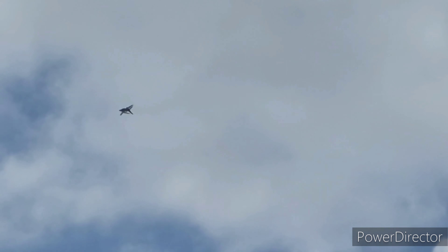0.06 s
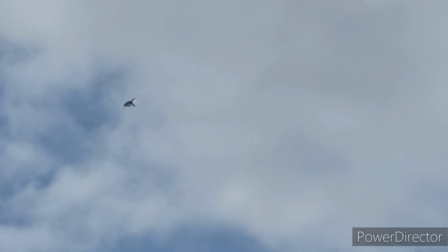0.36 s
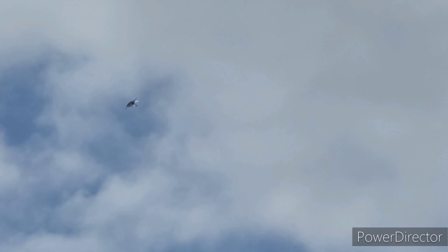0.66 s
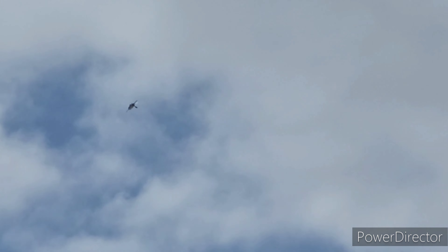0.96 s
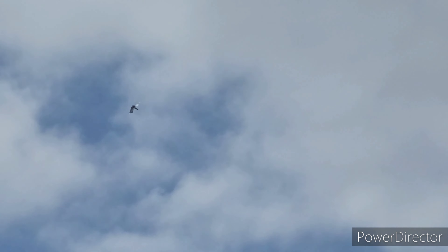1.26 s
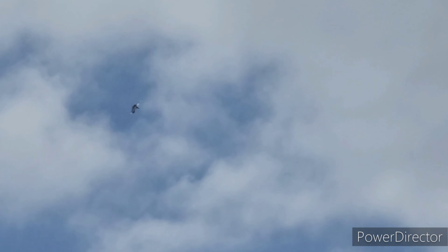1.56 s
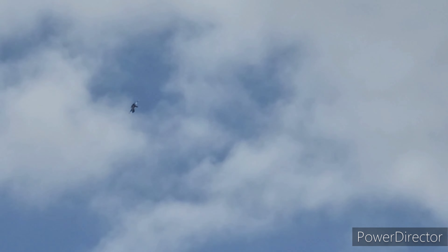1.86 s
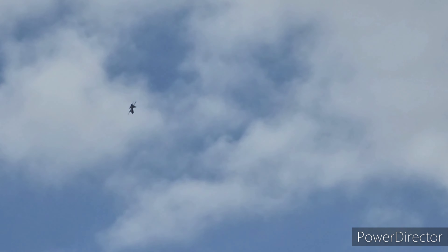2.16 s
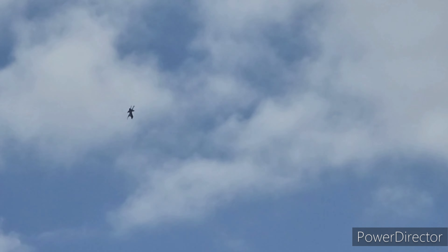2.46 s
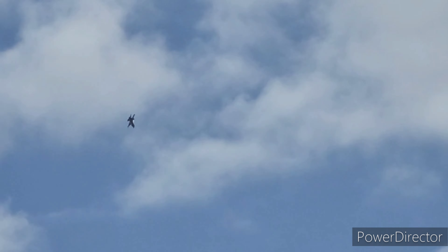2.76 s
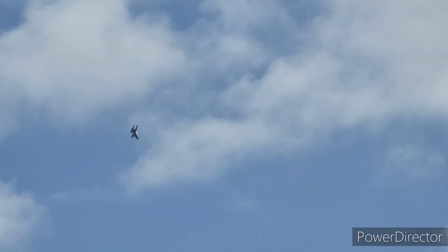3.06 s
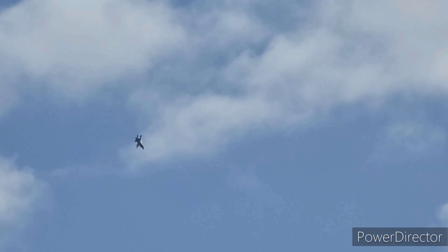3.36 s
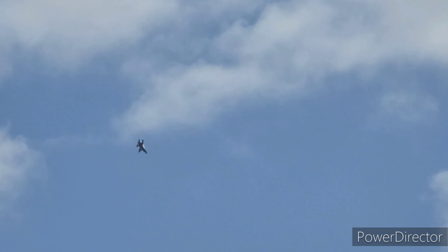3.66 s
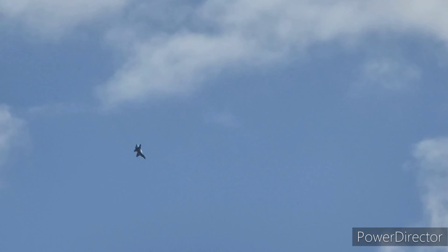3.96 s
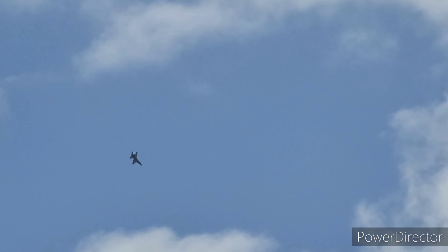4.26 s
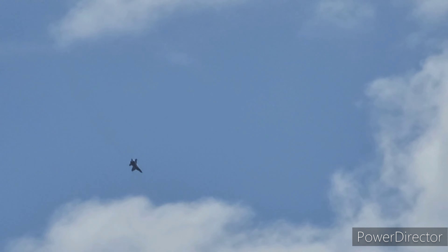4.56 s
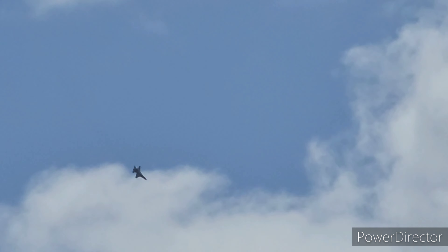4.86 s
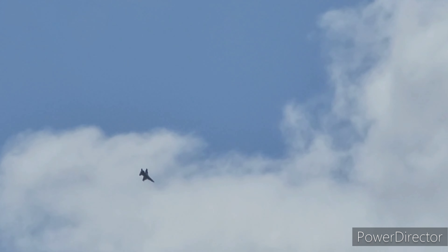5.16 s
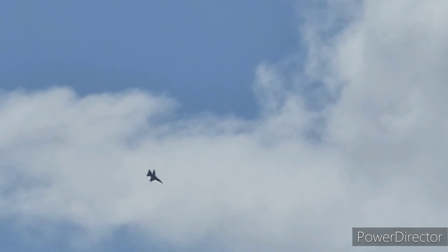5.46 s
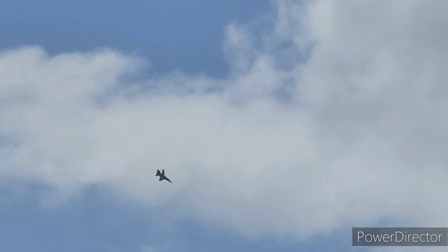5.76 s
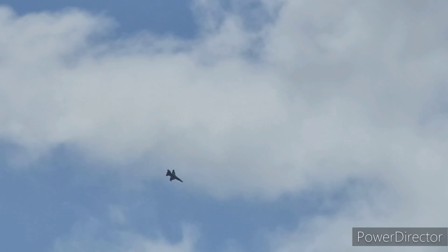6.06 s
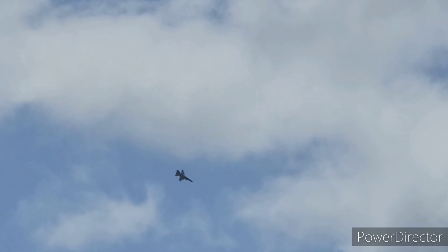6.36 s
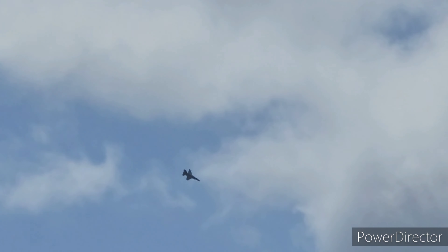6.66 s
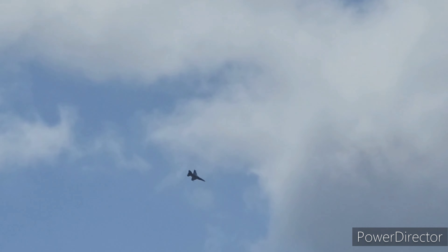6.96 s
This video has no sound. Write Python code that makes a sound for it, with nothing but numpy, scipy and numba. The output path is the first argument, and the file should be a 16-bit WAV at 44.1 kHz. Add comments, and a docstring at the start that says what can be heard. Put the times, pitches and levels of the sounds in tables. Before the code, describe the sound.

A fighter jet turns high over an open airfield, its deep rumble and airy roar continuous for seven seconds. The rumble surges at about 0.2, 1, 1.4 and 2.3 seconds, with brief gliding whooshes between 0.5 and 1 second. A narrow bass boom throbs unevenly, about three times a second, under a low wavering engine moan. The sound eases slightly around 3 to 3.5 seconds, then builds, growing darker and more hollow as the jet descends. Short tearing flares of roar come near 4.6, 5.4, 5.8 and 6.1 seconds. The loudest stretch runs from about 4.5 seconds onward, with low throbs and hollow ringing resonances, and the rumble is still strong at the end. Wind buffets the hand-held stereo microphone lightly at the start and more between 3.6 and 5.5 seconds. A faint steady hiss with a barely audible thin whine lies underneath.

```python
"""You hear a fighter jet rumble and roar as it turns high over an airfield.
It points its exhaust at a hand-held camera. Swirls in the exhaust, called eddies, make the noise,
which comes through turbulent air and by several paths. Single bands of it swell briefly, as gliding
whooshes, low throbs and hollow notes. A narrow boom rings in the bass, and wind buffets the two
microphone openings (the ports). A limiter turns down even the steady hiss under the loudest swells."""
import sys
import numpy as np
from scipy import signal
from scipy.fft import rfft, irfft
from scipy.io import wavfile
from scipy.ndimage import uniform_filter1d, minimum_filter1d
from numba import njit

SR = 44100
rng = np.random.default_rng(int(sys.argv[2]) if len(sys.argv) > 2 else 0)


def generate_wav(sig):
    """Save sig (samples, or channels by samples) to the path in sys.argv[1] as 16-bit PCM at SR."""
    pcm = np.round(np.clip(np.atleast_2d(sig).T, -1, 1) * 32767).astype(np.int16)
    wavfile.write(sys.argv[1], SR, pcm)


N = 308700  # 7 seconds

# The tone of the jet's deep thunder, low rumble and higher roar. Each row: frequency in Hz, level in dB.
THUNDER_SPECTRUM = [(15, -39), (30, -14), (45, -2.5), (57, 3), (64, 2.5), (75, 8), (86, 6), (112, -14),
                    (150, -54.5)]
RUMBLE_SPECTRUM = [(90, -32.5), (118, 0), (138, 3.5), (165, -2), (200, 0.5), (240, -2), (272, -2),
                   (312, -6.5), (370, -8), (450, -8.5), (540, -14.5), (800, -57.5)]
ROAR_SPECTRUM = [(250, -23.5), (450, -14.5), (570, 2.5), (760, 1.5), (1000, -1.5), (1270, -4.5),
                 (1570, -8.5), (1780, -22), (2030, -23), (2450, -40), (3200, -50), (6000, -76.5)]
# How alike the jet is at the two ports. Each row: frequency in Hz, likeness from 0 to 1.
JET_LIKENESS = [(100, 0.99), (320, 0.93), (550, 0.79), (1000, 0.79), (1500, 0.41), (2200, 0.94),
                (3000, 0.27)]
# The deep bass that drives both thunder and boom. Each row: time in seconds, level in dB.
BASS_LEVEL = [(0, -28.5), (.2, -19.5), (.35, -37), (.65, -38), (.9, -26.5), (1.05, -20.5), (1.75, -17.5),
              (2.4, -18), (2.85, -22), (3.35, -18), (3.6, -19), (3.8, -18.5), (4.7, -12), (5.3, -19.5),
              (5.7, -15), (5.83, -9), (6.05, -18.5), (7, -9.5)]
# The large eddies' rumble between surges. Each row: time in seconds, level in dB.
RUMBLE_LEVEL = [(0, -13), (.42, -17), (.52, -18.5), (.88, -16), (1.2, -15), (1.65, -15.5), (1.9, -12.5),
                (2.55, -13), (3.1, -18), (3.68, -14), (3.85, -12.5), (4.5, -9.5), (5, -11), (5.35, -8.5),
                (5.6, -8), (5.9, -11.5), (6.55, -14), (7, -6.5)]
# The fine eddies' roar between flares, louder when the nozzle points at the camera.
# Each row: time in seconds, level in dB.
ROAR_LEVEL = [(0, -20.5), (.42, -20), (.72, -22), (1.05, -17.5), (1.2, -22.5), (1.55, -21.5), (2.2, -23.5),
              (2.6, -22), (3.0, -26), (3.7, -20.5), (4.35, -14.5), (4.88, -18.5), (5.03, -24.5),
              (5.2, -17.5), (5.36, -18), (5.6, -17), (6.0, -18.5), (6.48, -20), (6.85, -16), (7, -19)]
# Echoes close to the camera. Each row: time in seconds, weight of the short echo, weight of the long one.
NEAR_ECHOES = [(0, 0.025, 0.032), (3.2, 0.028, 0.073), (4.6, 0.08, 0.21), (5.6, 0.38, 0.13),
               (6.1, 0.19, 0.32), (7, 0.28, 0.32)]
# The moan, gliding as the jet turns. Each row: time in seconds, pitch in Hz, dB relative to the rumble.
MOAN_GLIDE = [(0, 190, -3.5), (.8, 213.8, -19), (1.35, 135, -5), (2.2, 175, -6), (3.65, 130, -5),
              (3.8, 205, -11), (4.2, 208, -10.5), (4.45, 203, -9), (4.7, 145, -2), (5.25, 137, -1.5),
              (5.65, 130, 1), (5.85, 125.6, -11), (6.05, 135.6, 2), (6.45, 140, -17), (6.8, 165.3, -4),
              (7, 147, 0)]
# Ringing notes that make the rumble hollow. Each row: pitch in Hz, width in Hz, relative level in dB.
HOLLOW_NOTES = [(281.4, 12.3, -0.5), (351.6, 15, -2.5), (392.6, 9.8, -3), (445.3, 14, -3.5),
                (497.6, 8.8, -10)]
# Those notes stand out as the jet sinks. Each row: time in seconds, dB relative to the rumble.
HOLLOW_NOTE_LEVEL = [(0, -17), (3.5, -20), (4.2, -12.5), (4.6, -10.5), (5.15, -6), (5.65, -6), (5.9, -13.5),
                     (6.4, -9.5), (7, -11.5)]
# Surges of the rumble. Each row: peak time and half length in seconds, rise in dB, tilt in dB.
# A tilt above 0 is brighter, below 0 darker.
RUMBLE_SURGES = [(0.243, 0.056, 6, -3.5), (1.016, 0.07, 8.5, -6), (1.406, 0.094, 9, -3),
                 (2.32, 0.11, 8, -4.5), (4.013, 0.012, -1, 5), (4.6, 0.13, 0.5, -4.5), (5.627, 0.16, 2, 4),
                 (6.182, 0.093, 4.5, 1), (6.347, 0.064, 3, 6)]
# Tearing flares of the roar. Each row: peak time, rise time and fall time in seconds, rise and tilt in dB.
ROAR_FLARES = [(.55, 0.014, 0.036, 4, 9), (.672, 0.0082, 0.017, -2, 18), (.935, 0.017, 0.04, 6.5, 4),
               (1.042, 0.011, 0.013, -1.5, 4), (1.48, 0.084, 0.15, 3, 1), (1.89, 0.048, 0.12, 3.5, -2),
               (3.53, 0.039, 0.048, 5, -10), (3.83, 0.033, 0.055, 3, -1), (3.968, .004, .02, -1.5, 0),
               (4.186, .008, 0.03, 4, -3), (4.32, 0.022, 0.022, -1, 5), (4.61, 0.038, 0.08, 5.5, -1),
               (4.82, 0.029, 0.084, 4, 0), (5.21, 0.037, 0.045, 0.5, -3), (5.388, 0.0027, 0.055, 7.5, 0.5),
               (5.6, .04, 0.1, 3.5, 0), (5.83, .04, 0.092, 3.5, 2.5), (6.08, 0.036, 0.064, 6, 3),
               (6.36, 0.069, 0.084, 4.5, -4.5), (6.64, 0.011, 0.019, 4.5, 0)]
# Throbs and lulls of the boom. Each row: peak time in seconds, change in dB.
BOOM_THROBS = [(.09, 0), (.23, -2), (.5, 15), (.75, 10), (1.06, 5.5), (1.39, 5), (1.74, 9.5), (2.06, 4.5),
               (2.42, 8.5), (2.73, 8), (2.85, 3), (3.01, 7), (3.26, 3.5), (3.36, -25), (3.47, -1),
               (3.78, 8), (4.02, -7), (4.18, 1.5), (4.66, 2.5), (5.85, -9), (6.27, 3.5), (6.46, 4.5),
               (6.8, -3)]
# The tone of the camera's hiss. Each row: frequency in Hz, level in dB.
HISS_SPECTRUM = [(800, -10.5), (2000, 10), (2600, 1.5), (3100, 0.5), (3450, 0), (3850, -0.5), (4450, -7.5),
                 (5000, -6.5), (5450, -6.5), (5720, -4.5), (6020, -12), (6500, -8), (6850, -13.5),
                 (7300, -12), (8300, -13), (8750, -15.5), (9250, -16.5), (9800, -20), (11600, -22.5),
                 (13400, -27), (15500, -31.5)]
# How loud the hiss is. Each row: time in seconds, level in dB.
HISS_LEVEL = [(0, -37.5), (1.4, -38), (1.6, -37), (2.2, -38), (2.75, -37.5), (3.3, -38.5), (4.9, -38),
              (5.3, -39), (7, -38.5)]
# How alike the hiss is at the two ports. Each row: frequency in Hz, likeness from 0 to 1.
HISS_PORT_LIKENESS = [(2100, 0.23), (2800, 0.091), (5000, 0), (9000, 0.056)]
# The camera's faint whine. Each row: pitch in Hz, level in dB.
WHINE_TONES = [(2280, -60), (3363, -63), (8317, -80), (10912, -84.5), (13131, -92)]
# The tone of the wind on the ports. Each row: frequency in Hz, level in dB.
WIND_SPECTRUM = [(12, -14.5), (30, -15.5), (65, 4.5), (110, -7.5), (160, -4.5), (240, -20), (500, -23.5),
                 (1500, -74)]
# Gusts on the ports. Each row: peak time and half length in seconds, level in dB.
WIND_GUSTS = [(0.22, 0.37, -20.5), (1.25, 0.29, -33), (1.8, 0.13, -27), (2.46, 0.039, -18),
              (2.7, 0.064, -20.5), (3.206, 0.25, -27), (3.691, 0.079, -10.5), (4.053, 0.19, -14),
              (4.68, 0.11, -10), (5.265, 0.18, -13.5), (5.662, 0.29, -20.5)]
# Brief swells of one band of the jet noise. Each row: peak time and half length in seconds, pitch in Hz,
# glide in octaves per second (0 holds the pitch), width in Hz, level in dB.
BAND_SWELLS = [(0.46, 0.072, 687, 7, 180, -23.5), (0.555, 0.03, 1266, 2, 170, -20),
               (0.677, 0.0096, 1137, -1.5, 200, -19), (0.949, 0.068, 454, -2, 43, -16),
               (1.376, 0.059, 139.2, -1.5, 32, -9), (1.41, 0.12, 285.6, -2, 79, -10.5),
               (2.284, 0.043, 148, -1.5, 30, -6.5), (2.349, 0.2, 288.6, 0.5, 130, -12),
               (2.378, 0.044, 184.9, -2.5, 53, -7), (3.852, 0.036, 386.5, 1.5, 47, -12),
               (3.863, 0.044, 134.6, 0, 15, -18), (3.993, 0.036, 205.6, 0, 15, -8),
               (4.032, 0.028, 343, 0, 21, -11.5), (4.168, 0.037, 439, 0.5, 40, -15),
               (4.447, 0.031, 1402, 0.5, 110, -25), (4.595, 0.029, 148, 1, 23, -8.5),
               (4.616, 0.023, 1250, -5.5, 130, -20.5), (4.87, 0.046, 490.5, -1, 50, -16),
               (5.053, 0.045, 138, 0.5, 18, -8), (5.227, .07, 137.8, 0, 13, -7.5),
               (5.447, 0.026, 135, -0.5, 18, -11), (5.61, 0.048, 358, 0.5, 35, -5.5),
               (5.631, 0.062, 479, -1, 59, -10), (5.713, 0.032, 1220, -0.5, 190, -18),
               (5.86, 0.022, 1094, 0, 110, -22), (5.907, 0.018, 350, -0.5, 75, -10.5),
               (5.991, 0.034, 396, 1, 21, -10), (6.1, .06, 443, 1, 22, -17.5),
               (6.21, 0.057, 137.4, -1, 14, -9.5), (6.33, 0.022, 390, -0.5, 67, -10.5),
               (6.39, 0.018, 1068, -5, 81, -24), (6.635, 0.03, 371.6, 2.5, 33, -11),
               (6.65, 0.017, 1035, 0.5, 110, -17)]


def undb(db):
    """Turn decibels into a number to multiply a sound by."""
    return 10 ** (np.asarray(db) / 20)


def unit(x):
    """Scale a signal to an average power of 1."""
    return x / np.sqrt(np.mean(x ** 2))


def curves(table):
    """Join a table's points with straight lines in time: one curve for each column."""
    s, *columns = np.transpose(table)
    return [np.interp(np.arange(N) / SR, s, column) for column in columns]


def on_bins(points):
    """Read a table at every frequency of the spectrum, on a log scale."""
    hz, value = np.transpose(points)
    return np.interp(np.log(np.arange(N // 2 + 1) * SR / N + 1), np.log(hz), value)


def walk(rate):
    """A smooth random wobble of size about 1, with about rate changes a second."""
    hz = np.arange(N // 2 + 1) * SR / N
    return unit(irfft(rfft(rng.standard_normal(N)) * np.exp(-(hz / rate) ** 2), N))


def swell(s, half_s):
    """A smooth rise and fall that peaks at 1 at time s."""
    return np.exp(-((np.arange(N) / SR - s) / half_s) ** 2)


def noise(spectrum):
    """Two unrelated noises with the given spectrum, dying away steeply above its last point."""
    top_hz, top_db = spectrum[-1]
    shape = undb(on_bins(list(spectrum) + [(2 * top_hz, top_db - 60)]))
    return unit(irfft(rfft(rng.standard_normal((2, N))) * shape, N))


def steady(x, seconds):
    """Take the slow swells out of a noise and keep its fast flutter."""
    size = max(int(seconds * SR), 1)
    power = uniform_filter1d(uniform_filter1d(np.mean(x ** 2, axis=0), size), size)
    return x / np.sqrt(power + 1e-12)


def narrow_band(hz, width_hz):
    """Noise gathered round one pitch, which may glide."""
    phase = 2 * np.pi * np.cumsum(hz * np.ones(N)) / SR
    band = walk(width_hz) * np.cos(phase) + walk(width_hz) * np.sin(phase)
    return steady(band[None], seconds=0.063)


def at_ports(pair, likeness):
    """Mix two noises into left and right, as alike as the table says."""
    alike = np.clip(on_bins(likeness), 0, 1)
    shared, opposite = irfft(rfft(pair) * np.sqrt([1 + alike, 1 - alike]), N)
    return shared + opposite * np.array([[1], [-1]])


def delayed(x, lag_ms):
    """The sound a little later; the delay may change over time."""
    n = np.arange(N)
    return np.array([np.interp(n - lag_ms * SR / 1000, n, channel, period=N) for channel in x])


def tilted(x, tilt_db, pivot_hz):
    """Tip the tone like a seesaw: the highs go up as the lows go down."""
    hz = np.arange(N // 2 + 1) * SR / N
    low = irfft(rfft(x) / (1 + (hz / pivot_hz) ** 6), N)
    return low * undb(-tilt_db / 2) + (x - low) * undb(tilt_db / 2)


def jet():
    """Three sizes of eddy follow the swing of the nozzle; surges and flares change their level and tone."""
    t = np.arange(N) / SR
    aim_db = curves(ROAR_LEVEL)[0]
    surge_db, surge_tilt_db = surges()
    flare_db, flare_tilt_db = flares()
    thunder_db = bass_db() + 2.0 * walk(9.8)
    rumble_db = curves(RUMBLE_LEVEL)[0] + surge_db + 1.3 * walk(8.1)
    roar_db = aim_db + flare_db + 0.32 * surge_db + 0.72 * walk(4.0)
    # The sound darkens as the jet draws away. The rumble brightens when the nozzle points at us.
    rumble_tilt_db = 5.5 - 1.29 * t + surge_tilt_db + (aim_db - aim_db.mean()) + 2.0 * walk(8)
    roar_tilt_db = 2 - 0.5 * t + flare_tilt_db + 0.19 * surge_tilt_db + 0.25 * walk(5.0)
    thunder = eddies(THUNDER_SPECTRUM, flutter_db=-0.5, flutter_hz=6.1, echo_share=0.13)
    rumble = eddies(RUMBLE_SPECTRUM, flutter_db=-0.5, flutter_hz=22, echo_share=0.3)
    roar = eddies(ROAR_SPECTRUM, flutter_db=1.24, flutter_hz=30, echo_share=0.21)
    # Pockets of air bend the short waves along slightly different paths, so the roar swirls.
    roar = longer_paths(roar, share=0.2, lag_ms=1.599, wander=0.4426, fade_hz=10.4)
    rumble = near_echoes(tilted(rumble, rumble_tilt_db, pivot_hz=258), strength=0.7)
    roar = near_echoes(tilted(roar, roar_tilt_db, pivot_hz=1030), strength=0.67)
    rumble = steady(rumble, seconds=0.033) + moan()
    thunder = steady(thunder, seconds=0.052) * undb(thunder_db)
    rumble = steady(rumble, seconds=0.051) * undb(rumble_db)
    roar = steady(roar, seconds=0.045) * undb(roar_db)
    return thunder + rumble + roar


def eddies(spectrum, flutter_db, flutter_hz, echo_share):
    """Exhaust mixes noisily with the air. The ground echoes it and turbulent air makes it flutter."""
    exhaust = at_ports(noise(spectrum), JET_LIKENESS)
    echoed = longer_paths(exhaust, echo_share, lag_ms=6.5, wander=0.1612, fade_hz=3.36)
    return echoed * undb(flutter_db * walk(flutter_hz))


def longer_paths(x, share, lag_ms, wander, fade_hz, count=3):
    """Late copies fade and drift, so ripples slide through the tone."""
    lags = [lag_ms * (k + 1) * np.exp(wander * walk(0.704)) for k in range(count)]
    return x + sum(share * walk(fade_hz) * delayed(x, lag) for lag in lags)


def near_echoes(x, strength, short_ms=2.34, long_ms=3.43):
    """Two quick echoes, the later one upside down, hollow the sound more as the jet sinks."""
    short, long = curves(NEAR_ECHOES)
    return x + strength * (short * delayed(x, short_ms) - long * delayed(x, long_ms))


def bass_db():
    """The level of the deep bass, which lifts a little with the surges."""
    return curves(BASS_LEVEL)[0] + 0.18 * surges()[0]


def moan():
    """The strongest eddies peel off at a nearly even, gliding rate; hollow notes drift above them."""
    moan_hz, moan_db = curves(MOAN_GLIDE)
    drift = 1 + 0.012 * walk(1.5)
    hollow = sum(undb(db) * narrow_band(hz * drift, width_hz) * undb(2.17 * walk(8.2))
                 for hz, width_hz, db in HOLLOW_NOTES)
    note = narrow_band(moan_hz, width_hz=15) * undb(moan_db)
    return note + hollow * undb(curves(HOLLOW_NOTE_LEVEL)[0])


def boom(pitch_hz=103.95, above_bass_db=4.5, cap_db=-11.5):
    """The exhaust noise keeps a narrow, wavering bass note ringing, with throbs and lulls."""
    ring = narrow_band(pitch_hz * (1 + 0.01533 * walk(2.95)), width_hz=10.7)
    base_db = np.minimum(bass_db() + above_bass_db, cap_db)
    throb_db = sum(db * swell(s, half_s=0.038) for s, db in BOOM_THROBS)
    return ring * undb(base_db + throb_db + 1.3 * walk(14.0))


def camera_noise():
    """The camera's gently wavering hiss, wide between left and right, with a few thin whining tones."""
    t = np.arange(N) / SR
    whine = sum(undb(db) * unit(np.sin(2 * np.pi * hz * t)) for hz, db in WHINE_TONES)
    hiss = unit(at_ports(noise(HISS_SPECTRUM), HISS_PORT_LIKENESS))
    return hiss * undb(curves(HISS_LEVEL)[0] + 0.96 * walk(15)) + whine


def wind(breeze_db=-31):
    """Gusts rise out of a light breeze and buffet each port on its own."""
    buffet = noise(WIND_SPECTRUM) * undb([walk(4.3), walk(42)])
    force = undb(breeze_db) + sum(undb(db) * swell(s, half_s) for s, half_s, db in WIND_GUSTS)
    return steady(buffet, seconds=0.16) * force


def surges():
    """The rumble billows up and sinks back. Gives its rise and its tilt in dB."""
    shapes = [swell(s, half_s) for s, half_s, _, _ in RUMBLE_SURGES]
    return np.array(RUMBLE_SURGES)[:, 2:].T @ np.array(shapes)


def band_swells():
    """Brief swells of one band of the jet noise: gliding whooshes, low throbs and hollow notes."""
    t, out = np.arange(N) / SR, 0
    for s, half_s, hz, octaves_per_s, width_hz, db in BAND_SWELLS:
        centre_hz = hz * 2 ** np.clip(octaves_per_s * (t - s), -2, 2)
        out = out + narrow_band(centre_hz, width_hz) * swell(s, half_s) * undb(db)
    return out


def flares():
    """Each flare of the roar comes and goes at its own pace. Gives the rise and the tilt in dB."""
    t = np.arange(N) / SR
    shapes = [swell(s, np.where(t < s, rise_s, fall_s)) for s, rise_s, fall_s, _, _ in ROAR_FLARES]
    return np.array(ROAR_FLARES)[:, 3:].T @ np.array(shapes)


def scene():
    """Add up everything that reaches the left and right channels."""
    return jet() + band_swells() + boom() + wind() + camera_noise()


@njit
def follow_peaks(size, release):
    """Jump to every peak and sink back slowly."""
    out, held = np.empty(len(size)), 0.
    for i in range(len(size)):
        held = max(size[i], held * release)
        out[i] = held
    return out


def limiter(x, ceiling, release_s, glide_samples=50):
    """Turn the volume down just before a peak that is too loud, and back up after it."""
    peaks = follow_peaks(np.abs(x).max(axis=0), np.exp(-1 / (release_s * SR)))
    gain = minimum_filter1d(np.minimum(1, ceiling / (peaks + 1e-9)), 2 * glide_samples)
    return x * uniform_filter1d(uniform_filter1d(gain, glide_samples), glide_samples)


def record(dry):
    """The camera holds down the peaks and cuts the treble above 15400 Hz."""
    limited = limiter(dry, ceiling=1.0, release_s=0.034)
    treble_cut = signal.ellip(8, .1, 70, 15400, fs=SR, output="sos")
    return signal.sosfilt(treble_cut, limited)


dry = scene()
out = record(dry)
generate_wav(out)
```